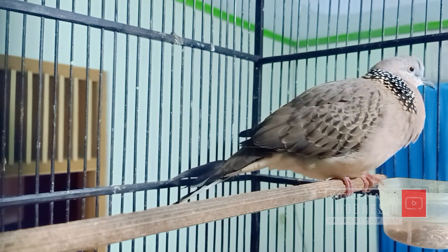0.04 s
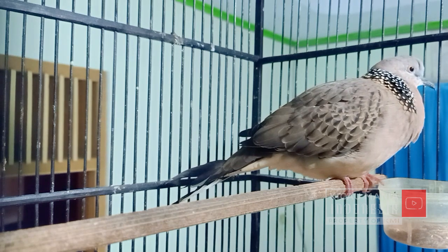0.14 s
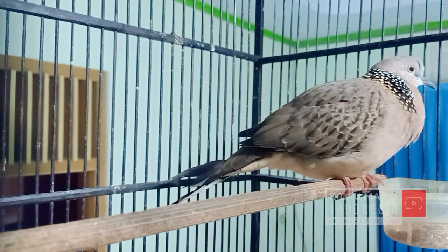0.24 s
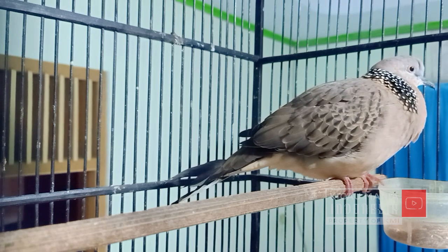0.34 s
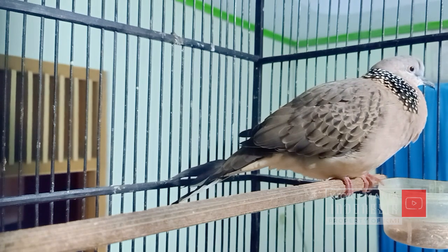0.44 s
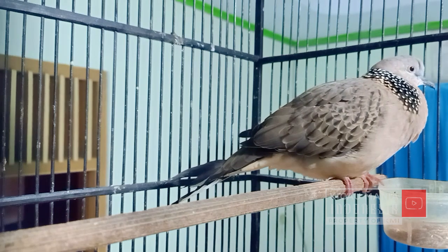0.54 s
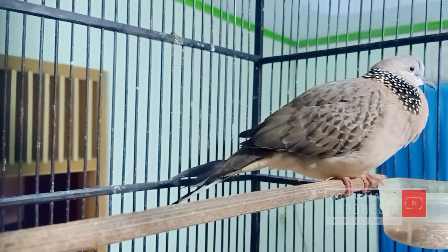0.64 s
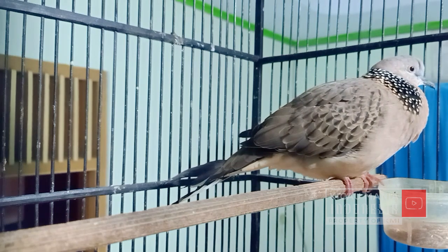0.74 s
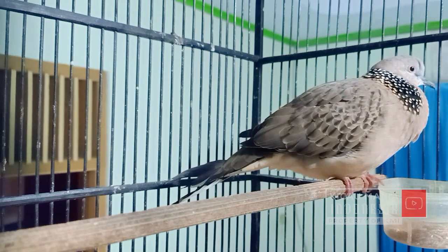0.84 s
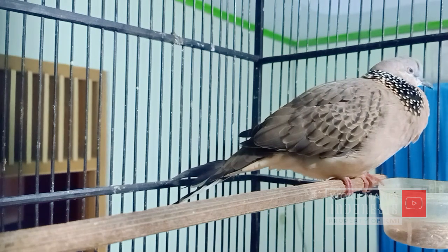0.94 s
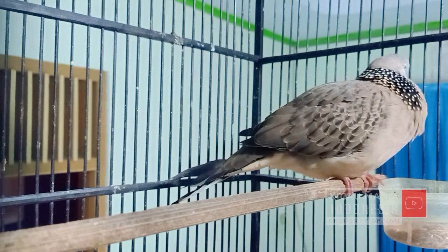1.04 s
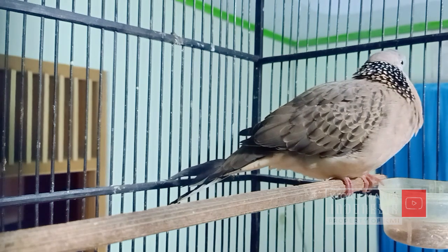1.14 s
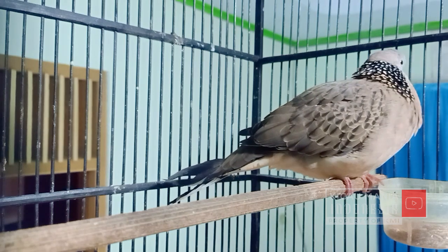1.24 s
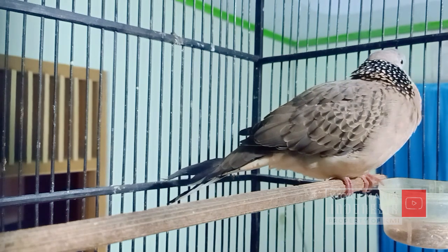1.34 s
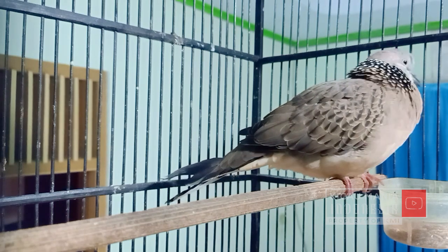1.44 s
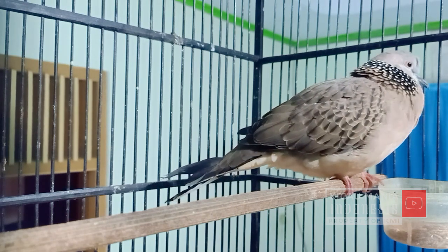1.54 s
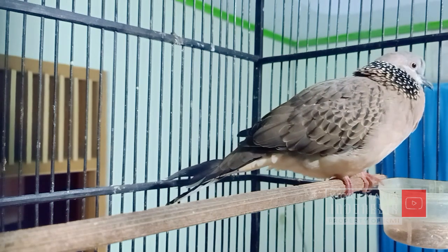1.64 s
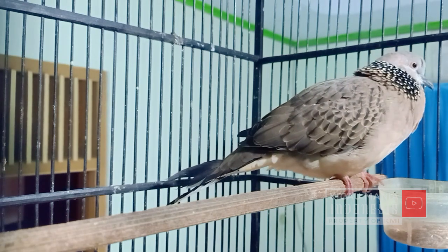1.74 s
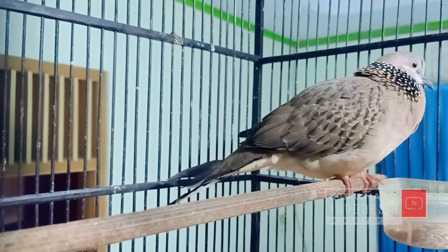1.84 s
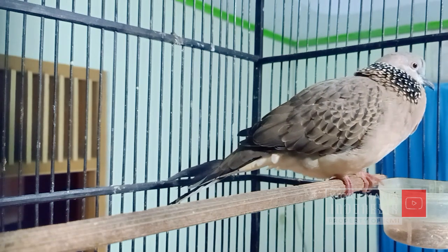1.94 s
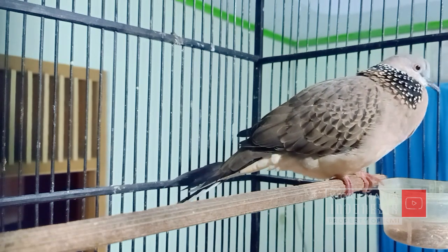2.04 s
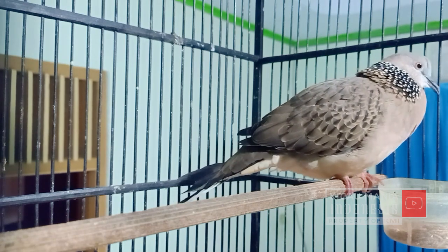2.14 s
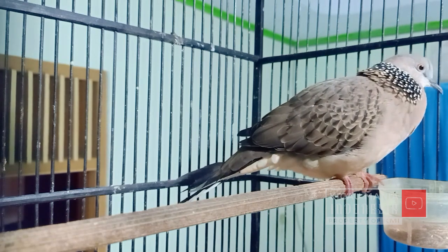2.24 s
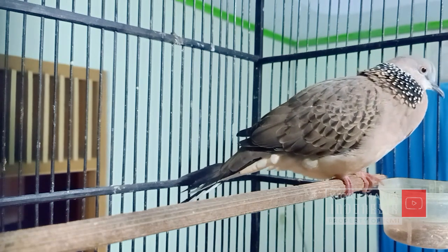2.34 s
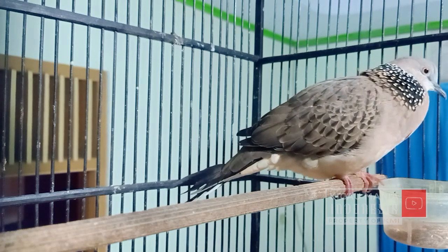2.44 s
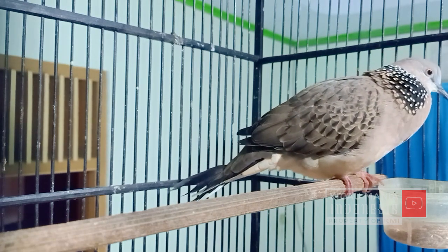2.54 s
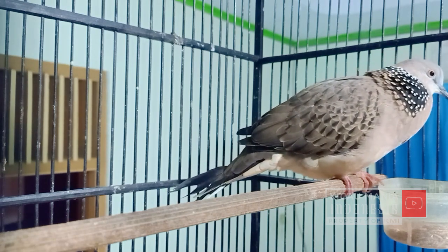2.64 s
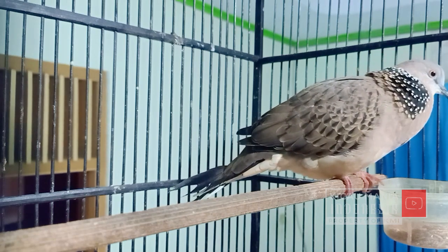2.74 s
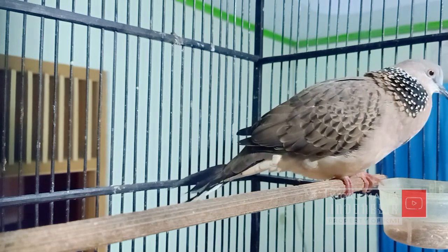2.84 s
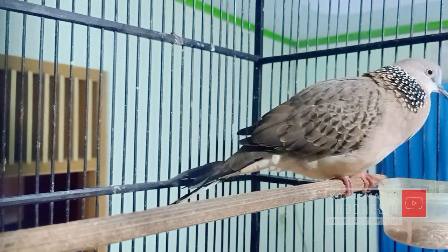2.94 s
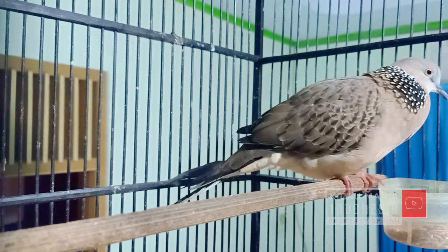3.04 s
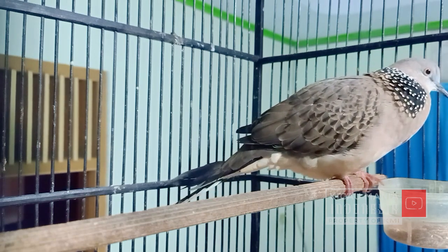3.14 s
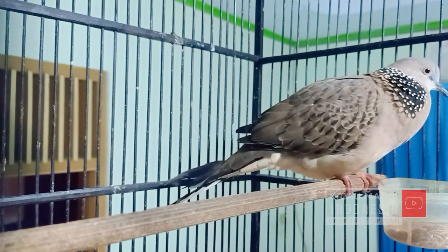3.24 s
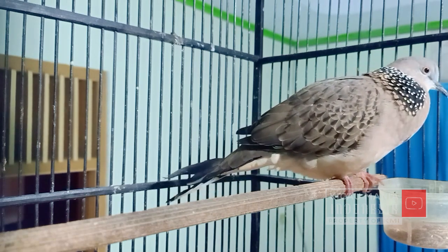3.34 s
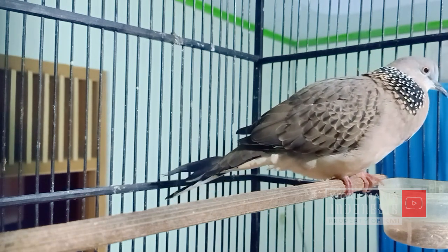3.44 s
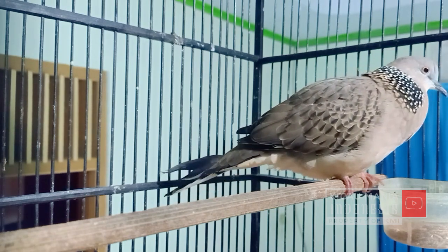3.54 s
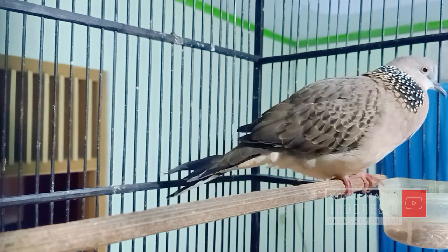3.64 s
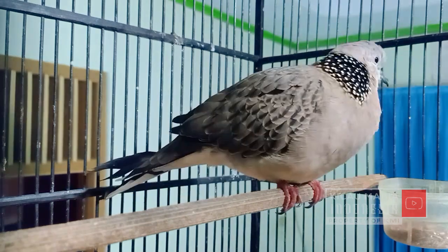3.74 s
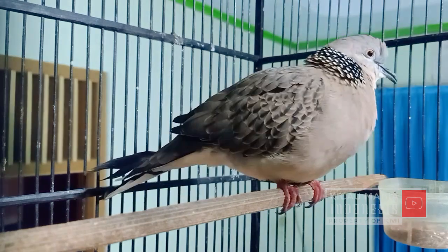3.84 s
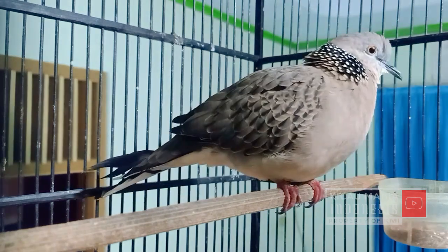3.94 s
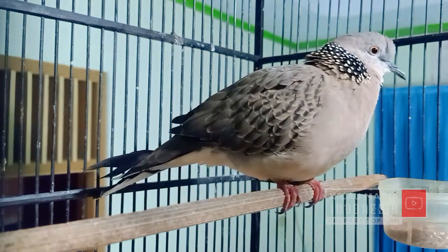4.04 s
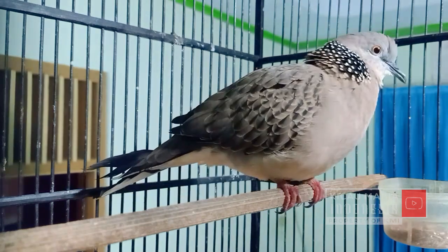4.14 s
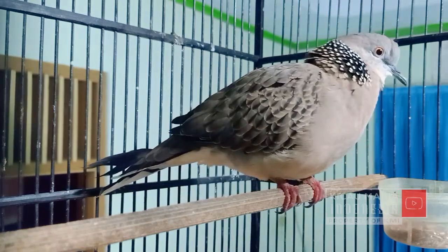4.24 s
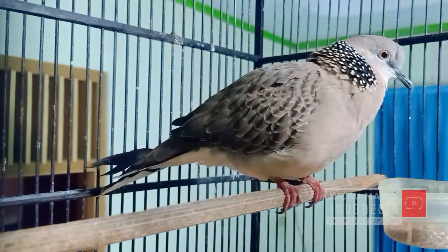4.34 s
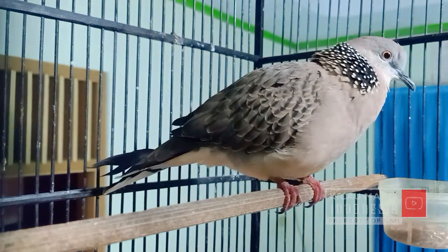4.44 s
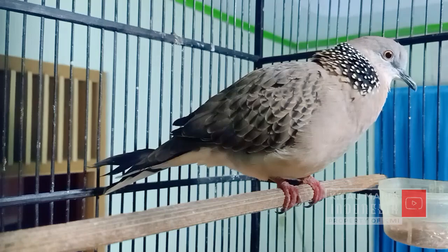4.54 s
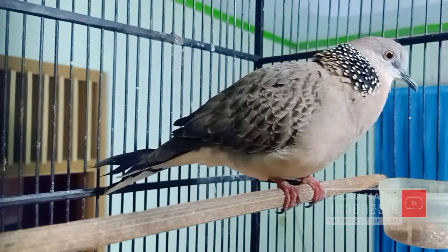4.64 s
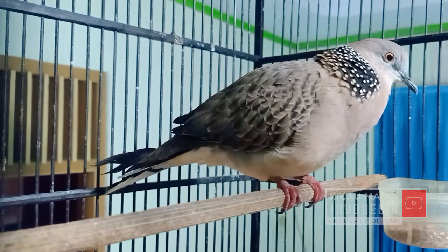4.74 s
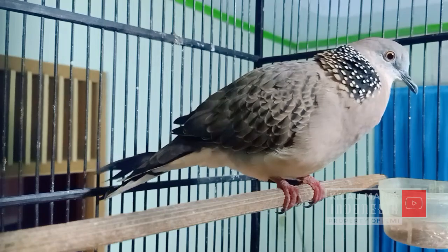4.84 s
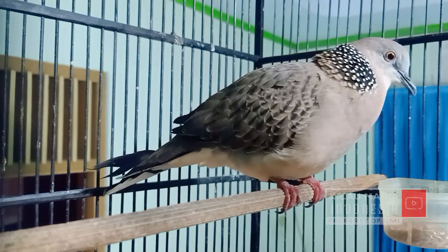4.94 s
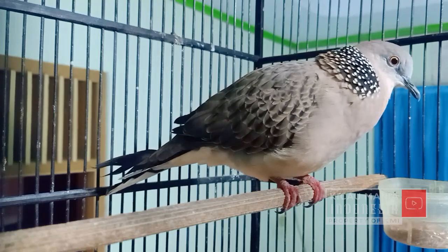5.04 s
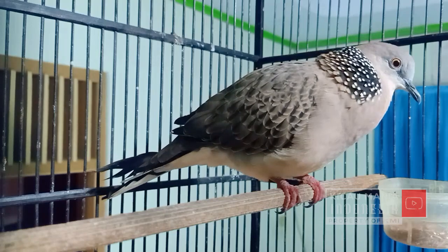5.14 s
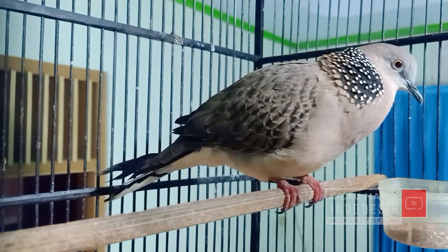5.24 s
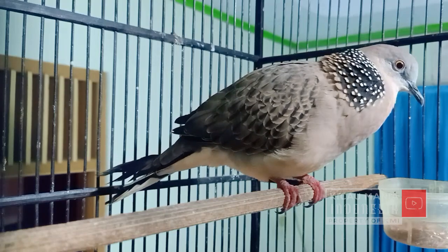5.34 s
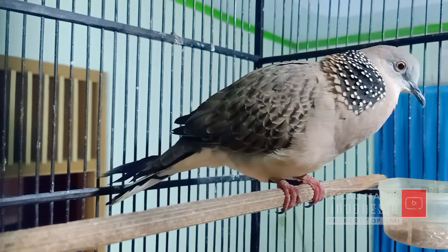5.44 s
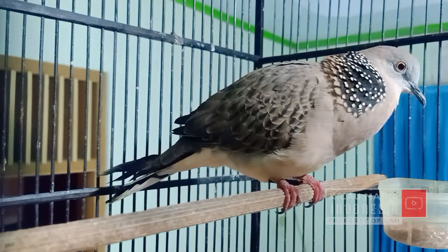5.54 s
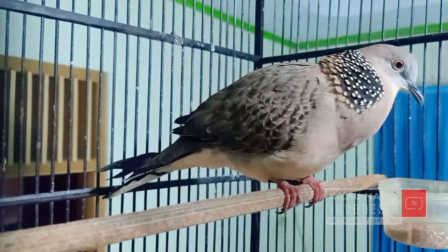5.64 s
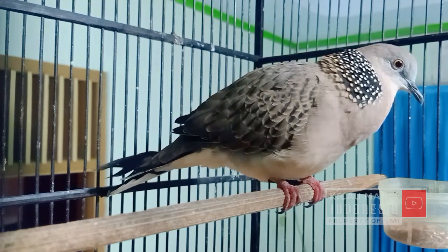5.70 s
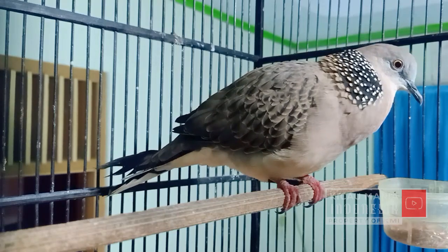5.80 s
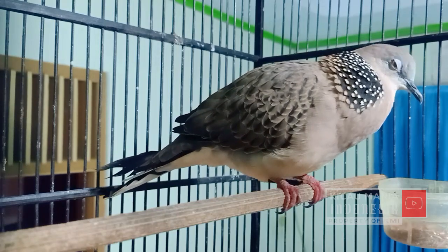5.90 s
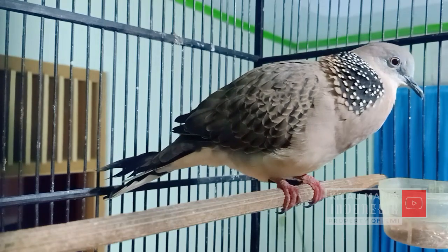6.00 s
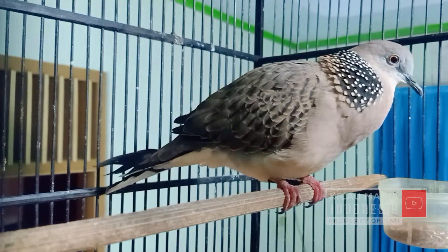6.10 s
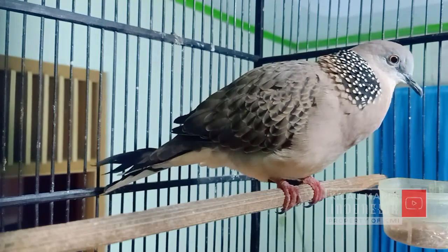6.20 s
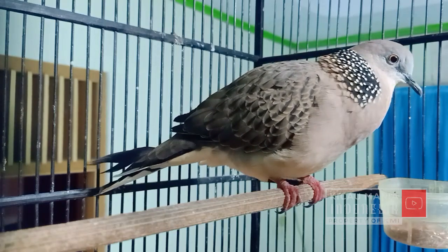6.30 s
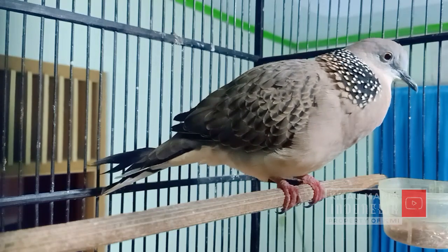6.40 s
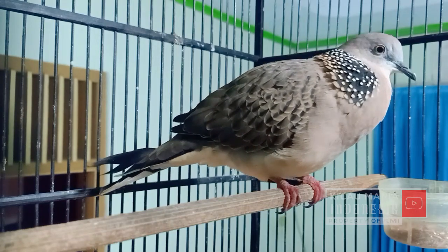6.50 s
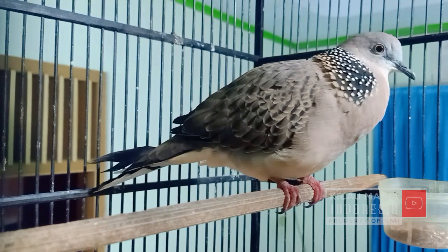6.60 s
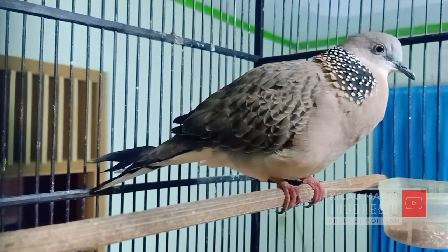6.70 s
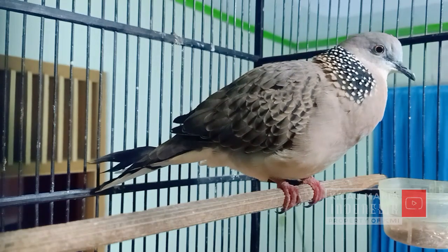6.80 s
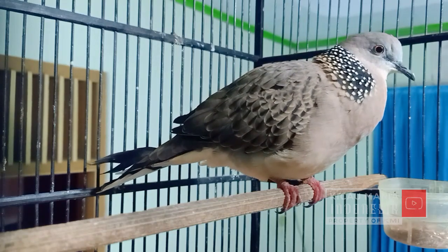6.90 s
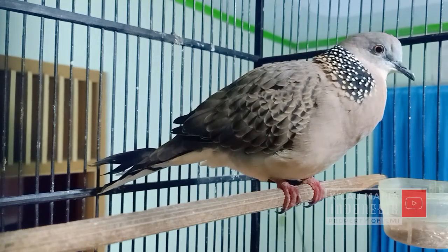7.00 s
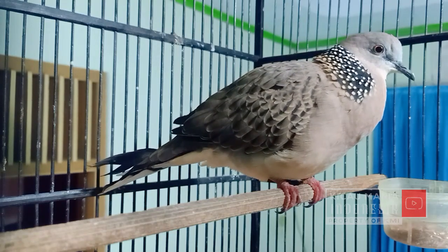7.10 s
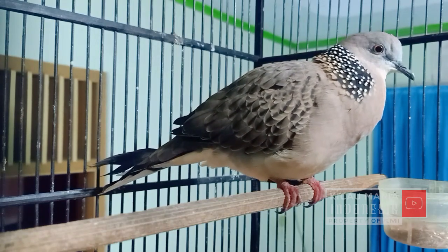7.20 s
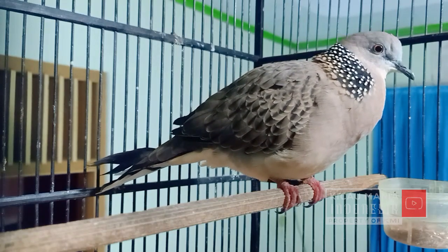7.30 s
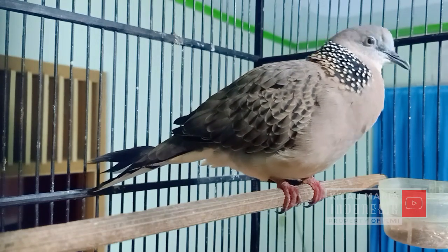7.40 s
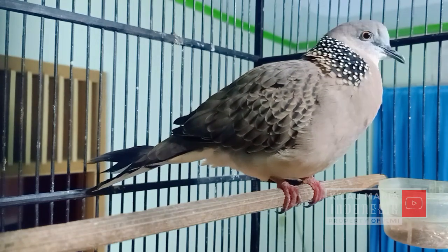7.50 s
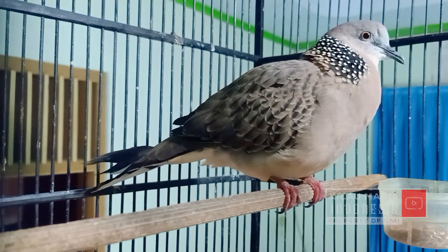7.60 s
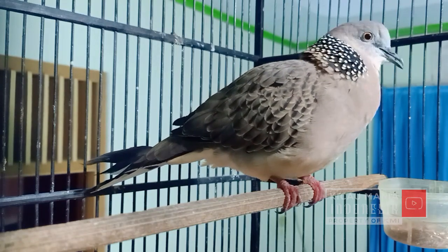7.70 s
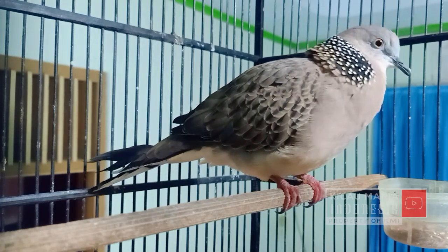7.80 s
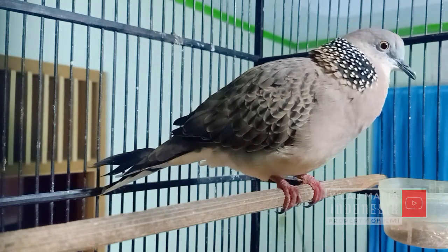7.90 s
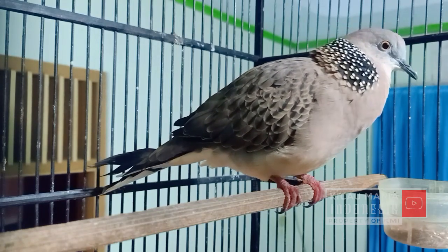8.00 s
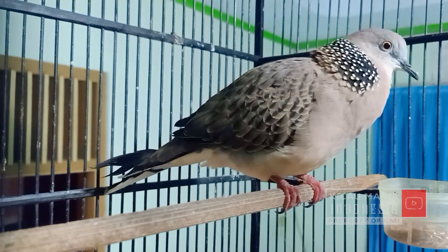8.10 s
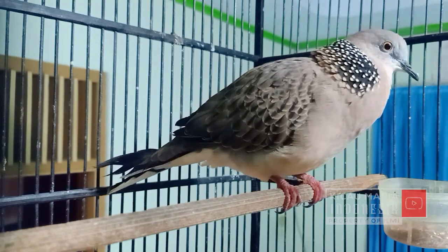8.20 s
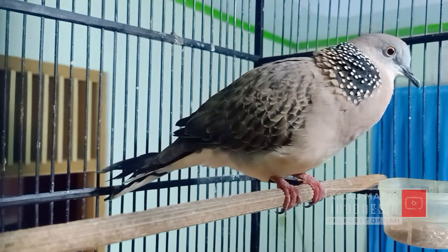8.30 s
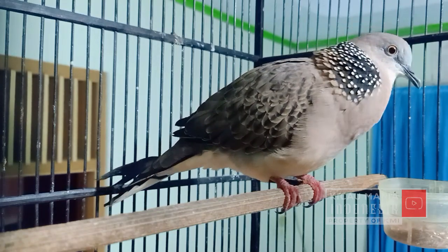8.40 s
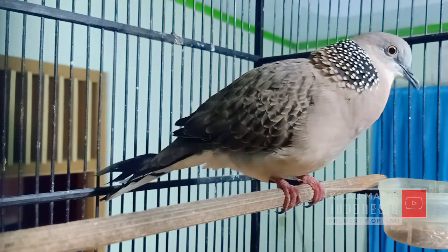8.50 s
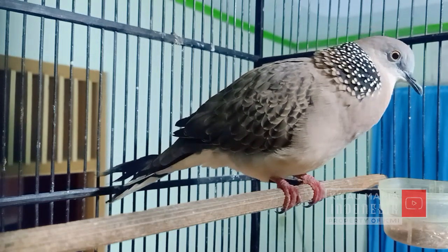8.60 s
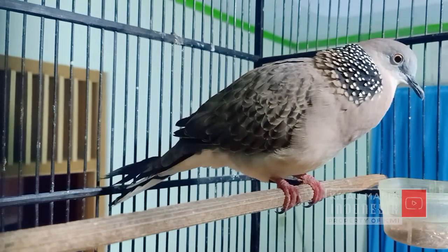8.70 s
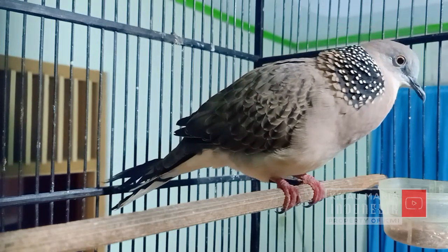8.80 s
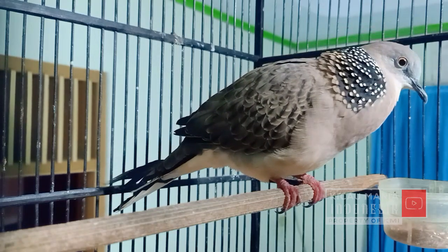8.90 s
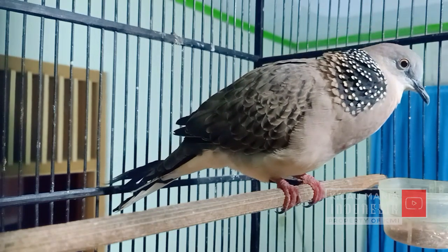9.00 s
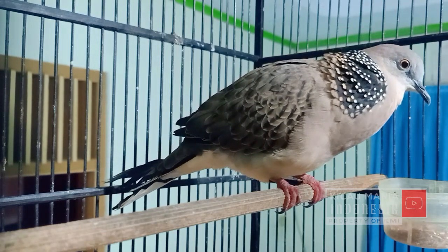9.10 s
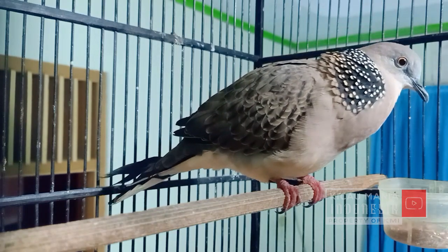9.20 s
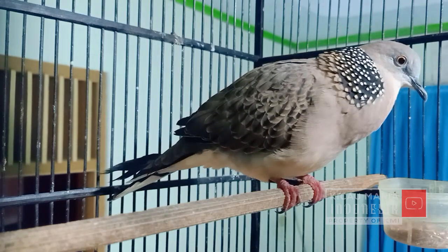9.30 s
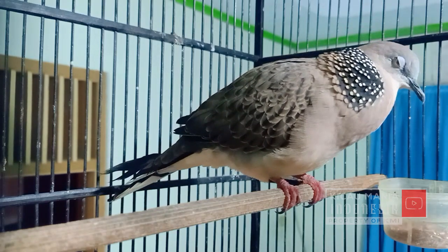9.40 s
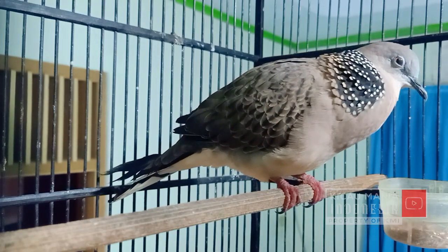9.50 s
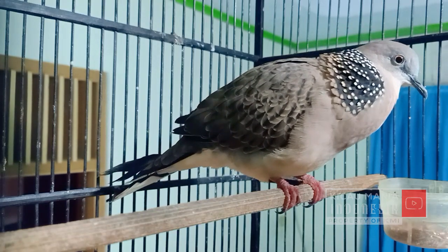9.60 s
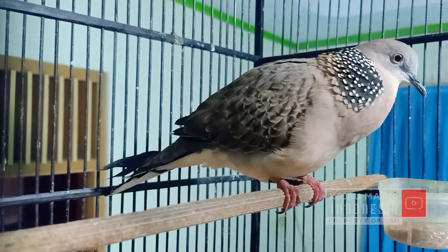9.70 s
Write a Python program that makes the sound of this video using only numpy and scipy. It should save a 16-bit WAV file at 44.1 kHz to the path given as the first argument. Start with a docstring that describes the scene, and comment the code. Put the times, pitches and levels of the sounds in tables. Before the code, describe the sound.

A caged dove close by coos three phrases of soft hiccups, arched notes and rolling falls; an engine cuts off abruptly, later a distant rooster crows.

```python
"""Over outdoor rumble and recorder hiss, a thin far-off tone wavers while an engine swells, then idles to the right.
A caged spotted dove coos close by in a ringing porch: each of three phrases has two short hiccups, an arched note,
a long rolling fall and a short fall, and the first two end on a further arch, the first broken off by a splice.
The engine stops there; a far rooster crows during the later phrases, as harmonics weighted by its throat.
The dove is a nearly pure tone shaped by neck, catches and porch; a limiter ducks under the loudest coos."""
import sys
import numpy as np
from scipy import signal
from scipy.fft import rfft, irfft, next_fast_len
from scipy.io import wavfile
from scipy.ndimage import uniform_filter1d, minimum_filter1d, map_coordinates

SR = 44100
rng = np.random.default_rng(int(sys.argv[2]) if len(sys.argv) > 2 else 0)


def output_pcm(signal):
    """Save a mono or channel-first signal as 16-bit PCM at the path in sys.argv[1].

    Samples are clipped to [-1, 1] before scaling.
    """
    pcm = np.clip(np.atleast_2d(signal).T, -1, 1) * 32767
    wavfile.write(sys.argv[1], SR, np.round(pcm).astype(np.int16))


N = 429975
T = np.arange(N) / SR
SPLICE_S, JOIN_S = 3.7435, .0012  # end and length of the crossfade

# Decay of the open yard. Each row: frequency in Hz, time to die by 60 dB in seconds.
YARD_DECAY = [(500, 1), (2000, 0.72), (7000, 0.06)]
# Long rolling falls of the coo.
# Each row: start in seconds, length in seconds, reference pitch in Hz, relative level in dB,
# first gap of the roll in seconds.
LONG_FALL_NOTES = [(2.257, 0.59, 846.6, -11, .052), (5.027, .59, 851.8, -9, .0475),
                   (8.565, .595, 843.4, -9.5, .05)]
# Short falls of the coo, with the same columns.
SHORT_FALL_NOTES = [(2.996, .28, 740.4, -5.5, .026), (5.769, .281, 739.5, -6, .024),
                    (9.333, .282, 750.3, -5, .0235)]


def amp(db):
    """Amplitude ratio: twenty decibels make a factor of ten."""
    return 10 ** (np.asarray(db) / 20)


def unit(x):
    """Normalization to unit rms, so that a later gain sets the level."""
    return x / np.sqrt(np.mean(x ** 2) + 1e-20)


def along(points, hz):
    """Interpolation of (Hz, value) points on a logarithmic frequency axis."""
    f, v = np.transpose(points)
    return np.interp(np.log(hz + 1), np.log(f), v)


def curves(rows, t=T):
    """Piecewise-linear control: one curve over t for each column after the first."""
    s, *columns = np.transpose(rows)
    return [np.interp(t, s, column) for column in columns]


def wobble(rate):
    """Slow random modulation: a smooth curve through rate random knots a second."""
    coarse = T[::16]
    knots = rng.standard_normal(int(N * rate / SR) + 4)
    return np.interp(T, coarse, map_coordinates(knots, [coarse * rate]))


def bell(t, width):
    """Gaussian pulse: a smooth bump of height 1 around t = 0."""
    return np.exp(-(t / width) ** 2)


def fade(t, length, edge_s):
    """Raised-cosine gating: opens at t = 0 and closes at length without a click."""
    return np.sin(np.pi / 2 * np.clip(np.minimum(t, length - t) / edge_s, 0, 1)) ** 2


def filtered(x, response):
    """Linear filtering: convolution in time is multiplication of spectra."""
    m = next_fast_len(N + SR // 2)
    hz = np.fft.rfftfreq(m, 1 / SR)
    return irfft(rfft(x, m) * response(hz), m)[..., :N]


def delayed(x, seconds):
    """Propagation delay: the same wave arriving later."""
    return np.interp(T - seconds, T, x, left=0)


def pair(size, side_db):
    """Partial coherence: white noise at two microphones as a shared part plus or minus a side part."""
    mid, side = rng.standard_normal((2, size)) * amp([[0], [side_db]])
    return np.array([mid + side, mid - side])


def rush(spectrum, side_db):
    """Coloured noise: white stereo noise weighted by a spectrum, at unit rms."""
    return unit(filtered(pair(N, side_db), lambda hz: amp(along(spectrum, hz))))


def reverb(x, decay, side_db):
    """Diffuse reverberation: convolution with noise in which each frequency dies at its own rate."""
    hz, t, z = signal.stft(pair(SR, side_db), SR, nperseg=512)
    decaying = z * amp(-60 * t / along(decay, hz)[:, None])
    tail = signal.istft(decaying, SR, nperseg=512)[1]
    tail = tail / np.linalg.norm(tail[0])
    return signal.fftconvolve(x[None], tail, axes=1)[:, :N]


def background(air_db=-57.5, hiss_db=-54.0):
    """Stationary noise shaped in frequency: outdoor rumble that swells once, and the recorder's narrow hiss."""
    # Outdoor rumble. Each row: frequency in Hz, relative density in dB.
    air_spectrum = [(20, -32), (50, -19), (93, -6), (150, -17.5), (270, -17.5), (400, -19.5), (900, -24),
                    (1500, -32), (2400, -30), (4500, -46), (8000, -63)]
    # Recorder hiss. Each row: frequency in Hz, relative density in dB.
    hiss_spectrum = [(3000, -38.5), (5500, -27), (6100, -6.5), (6500, -9), (6850, -0.5), (7200, 0.5),
                     (7450, -19.5), (7800, -35), (10000, -43), (15000, -39)]
    swell_s, swell_width_s, swell_db = 7.5, 0.4, 4
    air_level_db = air_db + swell_db * bell(T - swell_s, swell_width_s) + 1.2 * wobble(5.1)
    air = amp(air_level_db) * rush(air_spectrum, side_db=-11.0)
    hiss = amp(hiss_db) * rush(hiss_spectrum, side_db=0.0)
    return air + hiss * amp([[1], [-1]])  # left 2 dB above right


def whistle(jitter=0.0051, level_db=3):
    """Frequency modulation: a faint sine wavers at random and reaches the ear only as reverberation."""
    # Far-off tone. Each row: time in seconds, mean pitch in Hz, relative level in dB.
    track = [(.15, 2580, -84), (.45, 2593, -72), (.75, 2598, -71.5), (1.05, 2520, -63), (1.3, 2530, -75)]
    pitch, db = curves(track)
    wavering = pitch * (1 + jitter * wobble(200))
    tone = np.sin(2 * np.pi * np.cumsum(wavering) / SR)
    tone = amp(db + level_db) * tone * (T < track[-1][0])
    return reverb(tone, YARD_DECAY, side_db=-1)


def engine(hum_db=0, clatter_db=4, throb=0.09, lag_s=.00036):
    """Periodic combustion: exhaust hum at multiples of the firing rate, and clatter pulsing at half that rate."""
    # Swell, then steady idle.
    # Each row: time in seconds, mean firing rate in Hz, relative hum level in dB, relative clatter level in dB.
    course = [(0, 77.65, -63, -73), (1, 75.3, -67, -55.5), (1.2, 73, -49.5, -50.5), (1.8, 73.2, -47, -41.5),
              (2.3, 77.7, -46.5, -44), (3.74, 74.8, -43.5, -46)]
    # Exhaust partials. Each row: multiple of the firing rate, mean relative level in dB.
    hum_partials = [(1, 0), (2, -11), (2.5, -17), (3, -15), (3.5, -12.5)]
    # Mechanical clatter. Each row: frequency in Hz, relative density in dB.
    clatter_spectrum = [(60, -31.5), (110, -7.5), (200, -14), (370, -2.5), (620, -11.5), (940, -1),
                        (1400, -5.5), (1900, -11), (2250, -9.5), (2400, -1.5), (2600, -12), (3200, -17),
                        (4200, -28), (5600, -28), (8000, -66.5)]
    firing, low_db, high_db = curves(course)
    phase = 2 * np.pi * np.cumsum(firing * (1 + 0.0037 * wobble(12))) / SR
    partials = sum(amp(db + 1.3 * wobble(7)) * np.sin(k * phase) for k, db in hum_partials)
    hum = amp(low_db + hum_db) * unit(partials)
    pulsing = rush(clatter_spectrum, side_db=-4) * (1 + throb * np.sin(phase / 2))
    clatter = amp(high_db + clatter_db) * unit(pulsing)
    left, right = hum + clatter
    return np.array([delayed(left, lag_s), right])  # the right ear leads


def splice_click(click_db=-18, click_s=0.0018):
    """A short pulse has a broad spectrum: a tick of noise where the first stretch breaks off."""
    # Colour of the tick. Each row: frequency in Hz, relative level in dB.
    click_spectrum = [(100, -4), (600, 12.5), (1700, 8), (4000, 0), (9000, -9.5), (15000, -13)]
    tick = bell(T - SPLICE_S, click_s) * pair(N, side_db=-8.5)
    return amp(click_db) * filtered(tick, lambda hz: amp(along(click_spectrum, hz)))


def crow(edge_s=0.078, held_db=3.5, held_rasp=0.44, clearing_s=0.19, tire_db_per_s=10):
    """Effort sets pitch and rasp: hoarse syllables that each tire, then a held note rough only at its ends."""
    # Loudness of the long note. Each row: time in seconds, relative level in dB.
    held_level = [(6.98, -40), (7.184, -38.5), (7.214, -34), (7.444, -38.5), (7.5, -44), (7.566, -37.5),
                  (7.784, -36.5), (7.856, -30.5), (8.05, -40.5)]
    # Hoarse syllables. Each row: start in seconds, length in seconds, first mean pitch in Hz,
    # last mean pitch in Hz, rasp from 0 to 1, relative level in dB.
    syllables = [(5.91, 0.31, 758.7, 775, .95, -39.5), (6.243, 0.26, 847.4, 868.6, 0.83, -35),
                 (6.48, .55, 981.7, 916.3, 0.96, -33.5)]
    held_from_s, held_to_s, held_hz, creep_hz_per_s = 6.86, 8.1, 878, 33
    sag_from_s, sag_hz_per_s2 = 7.5, 270
    t, length = T - held_from_s, held_to_s - held_from_s
    # The pitch creeps up, then sags as the effort gives out.
    sag_time = np.clip(T, sag_from_s, held_to_s) - sag_from_s
    pitch = held_hz + creep_hz_per_s * t - sag_hz_per_s2 * sag_time ** 2
    rasp = held_rasp * (bell(t, clearing_s) + bell(t - length, clearing_s))
    size = amp(curves(held_level)[0] + held_db) * fade(t, length, edge_s)
    for start, span, first_hz, last_hz, roughness, level_db in syllables:
        tiring_db = level_db - tire_db_per_s * (T - start - span / 2)
        syllable = amp(tiring_db) * fade(T - start, span, edge_s)
        on = syllable > size
        pitch[on] = first_hz + (last_hz - first_hz) * (T[on] - start) / span
        rasp[on], size[on] = roughness, syllable[on]
    return pitch, np.clip(rasp, 0, 1), size


def rooster(level_db=-0.5, jitter=0.033, flutter_db=3, half_db=-4, direct_db=0, yard_db=-6, lag_s=0.0001485):
    """Period doubling puts partials between the harmonics when hoarse; a clear note has harmonics alone."""
    # Throat as heard from afar. Each row: frequency in Hz, relative level in dB.
    throat = [(450, -38), (700, -8), (880, 10.5), (1000, -7), (1150, -24), (1450, 2.5), (1750, -2),
              (1950, -3), (2150, -6.5), (2550, 7.5), (2750, -18), (3100, -24.5), (3600, -17), (4300, -28),
              (5050, -17), (5600, -31.5)]
    # Partials of the long clear note. Each row: multiple of the pitch, relative level in dB.
    clear_partials = [(1, -13), (2, -2.5), (3, -31.5), (4, -34.5), (5, -44.5), (6, -47.5), (7, -30.5)]
    pitch, rasp, size = crow()
    loud = size * amp(level_db + flutter_db * rasp * wobble(160))
    pitch = pitch * (1 + jitter * rasp * wobble(300) + 0.00099 * wobble(25))
    phase = 2 * np.pi * np.cumsum(pitch) / SR
    hoarse = 0
    for k in np.arange(2, 13) / 2:  # whole and half multiples
        partial_db = along(throat, k * pitch) + (half_db if k % 1 else 0)
        hoarse = hoarse + amp(partial_db) * np.sin(k * phase)
    clear = sum(amp(db) * np.sin(round(k) * phase) for k, db in clear_partials)
    voice = loud * (rasp ** 2 * hoarse + (1 - rasp ** 2) * unit(clear))
    direct = np.array([voice, delayed(voice, lag_s)])  # the left ear leads
    return amp(direct_db) * direct + amp(yard_db) * reverb(voice, YARD_DECAY, side_db=-1.5)


def standing_waves(hz):
    """Resonance: each standing wave of the porch passes a band whose width is inverse to its decay time."""
    # Porch modes. Each row: frequency in Hz, gain at resonance in dB, time to die by 60 dB in seconds.
    modes = [(680, -21, 0.47), (703, -6, 0.98), (710, -2, 0.69), (817, -15.5, 1)]
    response = 0
    for f, db, t60 in modes:
        loss = 1j * hz * np.log(1000) / np.pi / t60
        response = response + amp(db) * loss / (f * f - hz * hz + loss)
    return response


def porch(voice, room_db=-11):
    """Room acoustics: direct sound, discrete wall echoes, standing waves and a diffuse tail."""
    # Nearby walls. Each row: delay in seconds, echo re direct sound in dB.
    walls = [(.0062, -26.5), (.0135, -24.5), (.021, -18), (.034, -18.5)]
    # The porch rings longest near the coo's pitch.
    # Each row: frequency in Hz, time to die by 60 dB in seconds.
    porch_decay = [(200, .4), (500, 0.6), (720, 0.69), (900, 0.96), (1500, 0.087), (6000, 0.28)]
    echoes = sum(amp(db) * delayed(voice, s) for s, db in walls)
    near = voice + echoes + filtered(voice, standing_waves)
    both = near + amp(room_db) * reverb(voice, porch_decay, side_db=-2)
    return both * amp([[.8], [-.8]])  # left 1.6 dB above right


def note(shape, start, length, top_hz, db, edge_s=0.0032):
    """Similarity of gestures: one shape stretched and transposed into samples, pitch and size."""
    i = np.arange(int(start * SR), min(int((start + length) * SR), N))
    t = T[i] - start
    ratio, shape_db = curves(shape, t / length)
    return i, top_hz * ratio, amp(db + shape_db) * fade(t, length, edge_s)


def notes(dip_s=0.012):
    """Joint modulation of pitch and level in every note of the three phrases."""
    # Gestures of the four kinds of note.
    # Each row: share of the note's length, pitch over its reference pitch, relative level in dB.
    hiccup_shape = [(0, .85, -8.5), (.14, 0.99, -2), (.38, 0.98, 2.5), (.66, .87, -5), (1, .76, -11)]
    arch_shape = [(0, .56, -24.5), (.1, .76, -11.5), (.27, .87, -7.5), (.45, 0.97, -2.5), (.58, 1, -1.5),
                  (.72, 0.97, -2), (.85, .89, -7), (.94, .73, -15.5), (1, .54, -31)]
    long_fall_shape = [(0, .77, -8.5), (.04, .91, 3), (.11, 0.95, -0.5), (.28, .965, 0), (.49, .85, 0.5),
                       (.64, .77, -5.5), (.77, .665, -10), (.92, .54, -14), (1, .49, -26)]
    short_fall_shape = [(0, .66, -16), (.048, .79, -6), (.135, .91, -11), (.23, 0.9961, 0.5),
                        (.43, .9, -5.5), (.65, .84, -7.5), (.87, .76, -12.5), (.94, .7, -15), (1, .55, -28)]
    # Soft opening hiccups, in pairs.
    # Each row: start in seconds, length in seconds, reference pitch in Hz, relative level in dB.
    hiccups = [(1.503, .055, 654.2, -14.5), (1.631, 0.036, 520.9, -23.5), (4.281, .063, 585.8, -17),
               (4.416, .05, 513.6, -21), (7.807, .06, 652, -14.5), (7.95, .042, 515.3, -20.5)]
    # Arched notes, each with a brief level dip as if from porch echoes cancelling it.
    # Each row: the same four columns, then delay of the dip in seconds, change at the dip in dB.
    arches = [(1.889, 0.2114, 772, -2.5, 0.11, -3.5), (3.624, 0.16, 703.3, -5, 0.1, -2.5),
              (4.681, 0.19, 731, -4.5, 0.075, -19.5), (6.304, .207, 719.2, -4.5, .07, -23),
              (8.184, 0.2, 780.6, -3.5, .054, -11)]
    for row in hiccups:
        yield note(hiccup_shape, *row)
    for start, length, top_hz, db, dip_after, dip_db in arches:
        i, pitch, size = note(arch_shape, start, length, top_hz, db)
        yield i, pitch, size * amp(dip_db * bell(T[i] - start - dip_after, dip_s))
    for shape, rows in (long_fall_shape, LONG_FALL_NOTES), (short_fall_shape, SHORT_FALL_NOTES):
        for *row, first_gap in rows:
            yield note(shape, *row)


def roll(falls, delay_s, first_depth, last_depth, count):
    """Exponential relaxation: catches (s, depth 0-1) quicken to a steady gap and grow shallower."""
    steady_gap_s, settle_catches = .0205, 3.4
    k = np.arange(count - 1)
    depths = np.clip(np.linspace(first_depth, last_depth, count), 0, 1)
    for start, *_, first_gap in falls:
        gaps = steady_gap_s + (first_gap - steady_gap_s) * np.exp(-k / settle_catches)
        times = start + delay_s + np.append(0, np.cumsum(gaps))
        yield from zip(times, depths)


def coo(catches, catch_s=0.0032, sag=.42, choke=0.81, lead_s=0.0023, choke_s=0.0115,
        burst=0.94, burst_s=0.0076, jitter=.004, catch_jitter=0.061):
    """Source and filter: a nearly pure tone through the neck, choked rough at each catch before it bursts out."""
    # Overtones of the coo. Each row: multiple of the pitch, relative level in dB.
    overtones = [(1, 0), (2, -27), (3, -48.5), (4, -48.5), (6, -64)]
    # What the swollen neck lets through. Each row: frequency in Hz, gain in dB.
    neck = [(400, -2.5), (850, 7.5), (1100, 4), (1350, -2.5), (1600, -8), (1900, -6.5), (2400, -2.5),
            (3100, 0.5), (5000, -7)]
    pitch, size, rough = np.full(N, 500.), np.zeros(N), np.zeros(N)
    for i, note_pitch, note_size in notes():
        pitch[i], size[i] = note_pitch, note_size
    for s, depth in catches:
        i = int(s * SR) + np.arange(-SR // 40, SR // 40)
        t = T[i] - s
        closing = bell(t + lead_s, choke_s * np.sqrt(depth + 1e-9))  # deep catches last longer
        choked = min(choke * depth, 1) * closing
        pitch[i] *= 1 - sag * depth * bell(t, catch_s)  # its recovery is a quick upward slide
        size[i] *= 1 - choked + burst * depth * bell(t - burst_s, burst_s / 2)
        rough[i] += choked
    pitch = pitch * (1 + jitter * wobble(120) + catch_jitter * rough * wobble(600))
    phase = 2 * np.pi * np.cumsum(pitch) / SR
    return size * sum(amp(db + along(neck, k * pitch)) * np.sin(round(k) * phase) for k, db in overtones)


def dove(voice_db=1.5733, tremble=.07):
    """Amplitude modulation: long falls roll, short ones stutter near the start, and the strength trembles."""
    long_roll = roll(LONG_FALL_NOTES, delay_s=.003, first_depth=1.08, last_depth=0.41, count=15)
    stutter = roll(SHORT_FALL_NOTES, delay_s=.0275, first_depth=.78, last_depth=.6, count=3)
    return amp(voice_db) * coo([*long_roll, *stutter]) * (1 + tremble * wobble(150))


def scene():
    """Superposition: sources add within two stretches of time, which a hard splice joins."""
    voice = dove()
    first = np.clip((SPLICE_S - T) / JOIN_S, 0, 1)
    before = porch(voice * (T < SPLICE_S), room_db=-7.5) + engine() + whistle()
    after = porch(voice * (T > SPLICE_S + .5), room_db=-8) + rooster()
    return first * before + (1 - first) * after + splice_click() + background()


def record(dry, ceiling_db=0.21, release_db_per_s=6.5, top_hz=15800):
    """Dynamic range limiting: gain drops within two milliseconds and recovers slowly, then the band is cut."""
    level_db = 20 * np.log10(np.abs(dry).max(axis=0) + 1e-9)
    over_db = np.maximum(level_db - ceiling_db, 0)
    released_db = release_db_per_s * T
    duck_db = np.maximum.accumulate(over_db + released_db) - released_db
    duck_db = uniform_filter1d(-minimum_filter1d(-duck_db, size=62), size=62)  # short look-ahead
    return filtered(dry * amp(-duck_db), lambda hz: hz < top_hz)


dry = scene()
out = record(dry)
output_pcm(out)
```